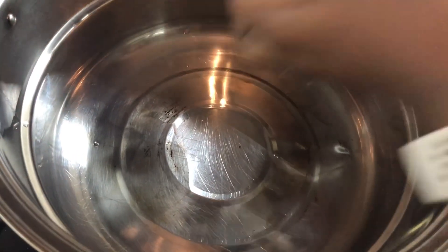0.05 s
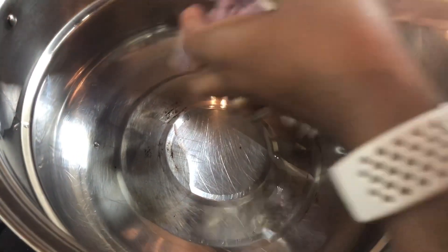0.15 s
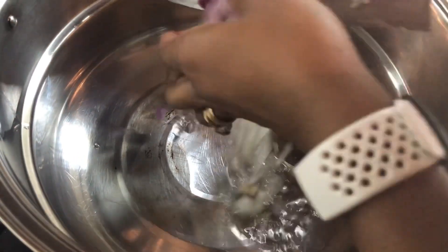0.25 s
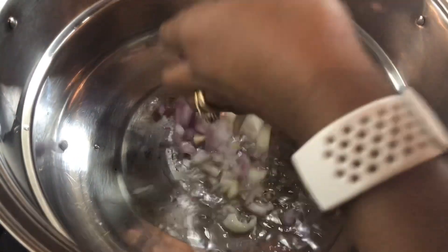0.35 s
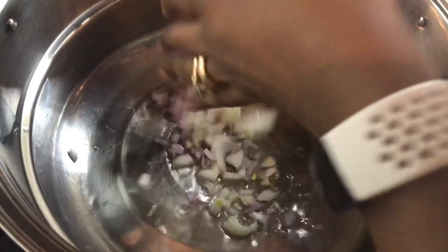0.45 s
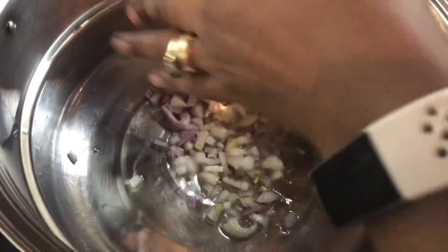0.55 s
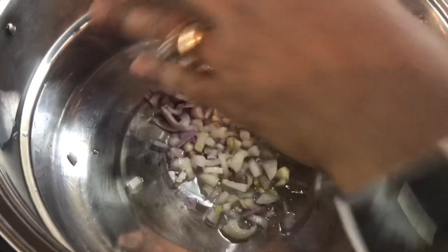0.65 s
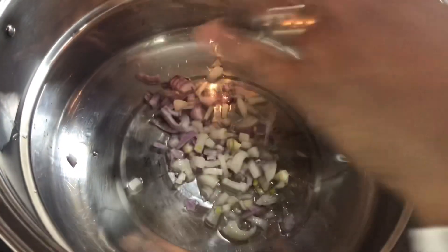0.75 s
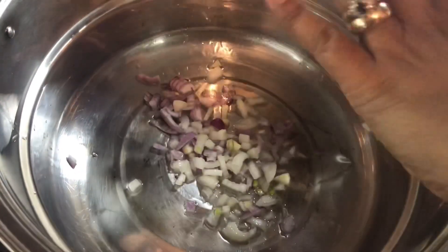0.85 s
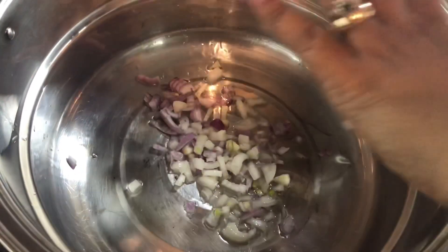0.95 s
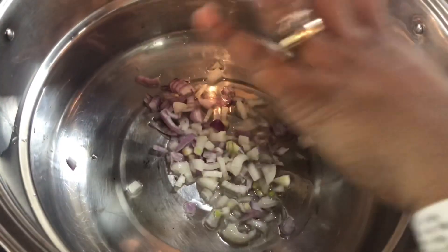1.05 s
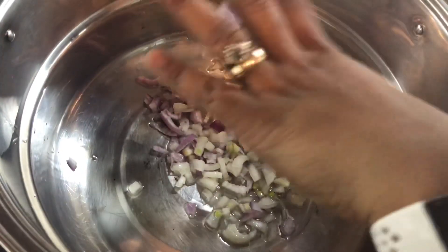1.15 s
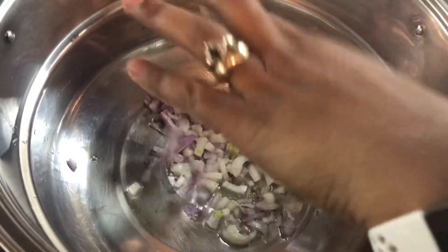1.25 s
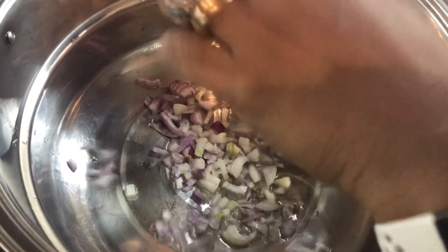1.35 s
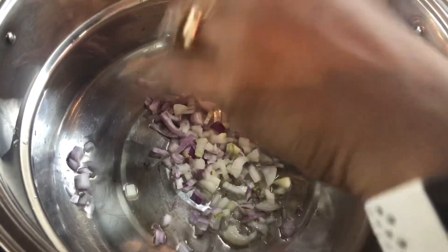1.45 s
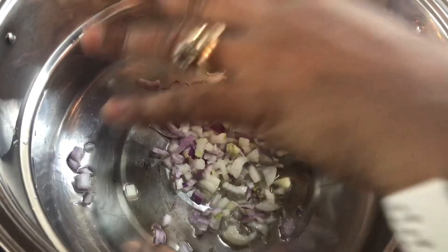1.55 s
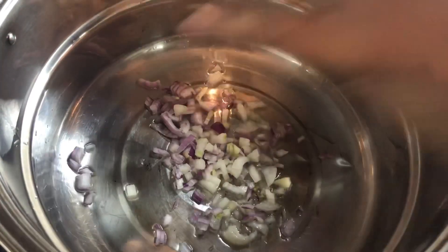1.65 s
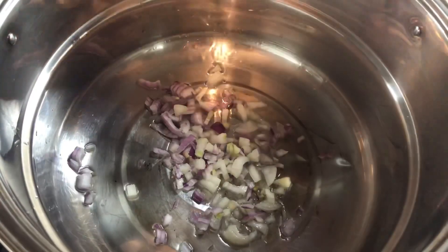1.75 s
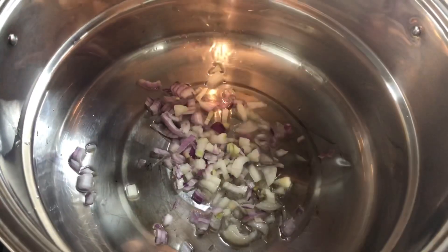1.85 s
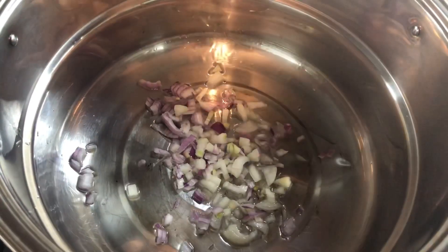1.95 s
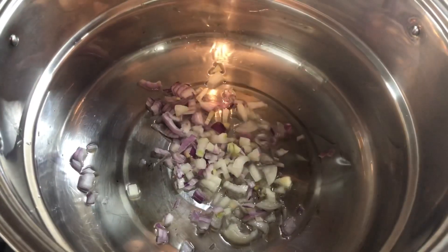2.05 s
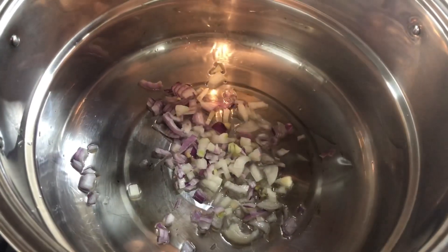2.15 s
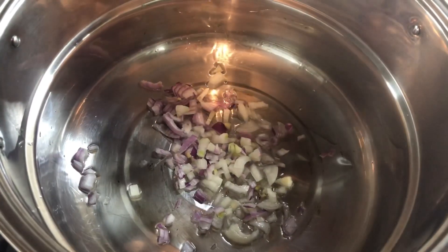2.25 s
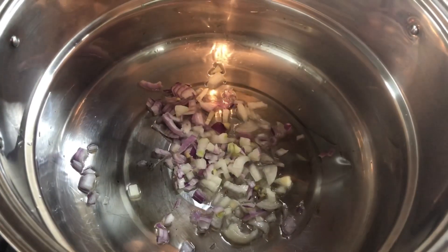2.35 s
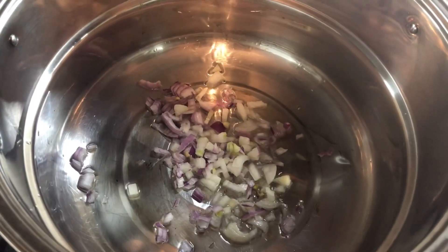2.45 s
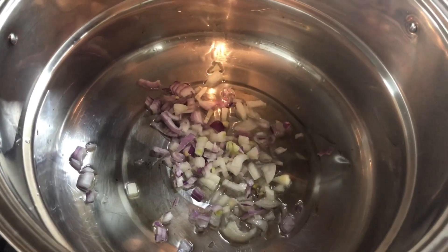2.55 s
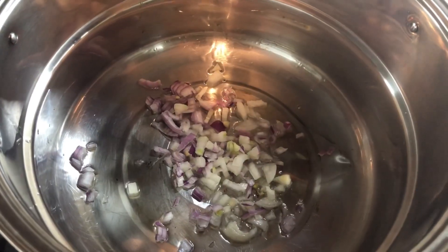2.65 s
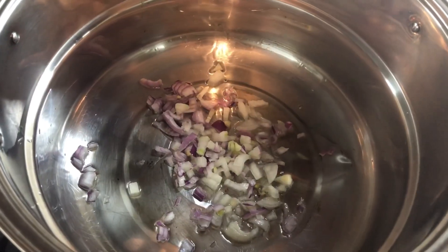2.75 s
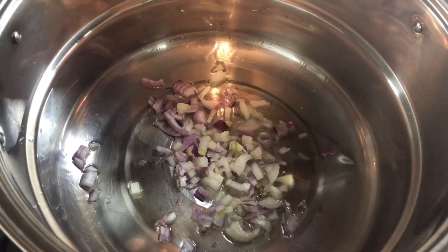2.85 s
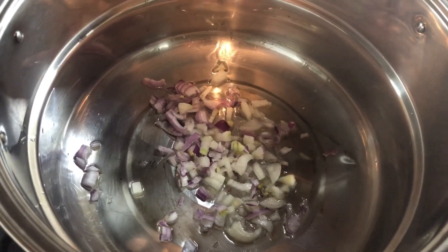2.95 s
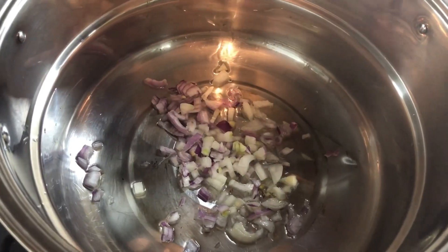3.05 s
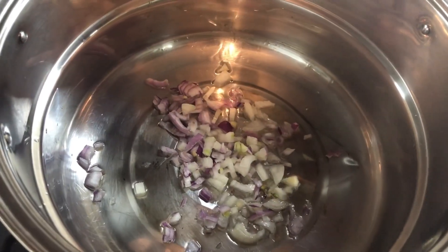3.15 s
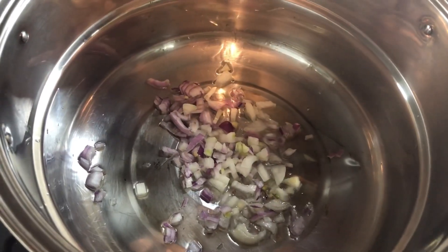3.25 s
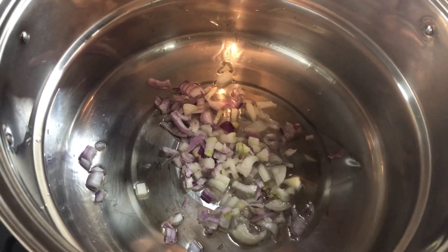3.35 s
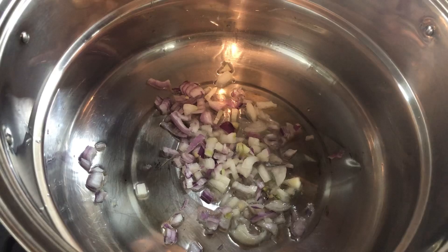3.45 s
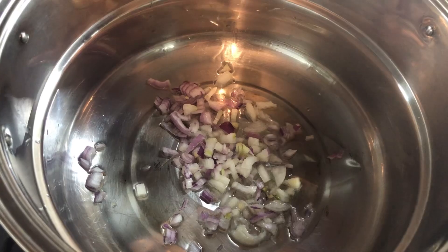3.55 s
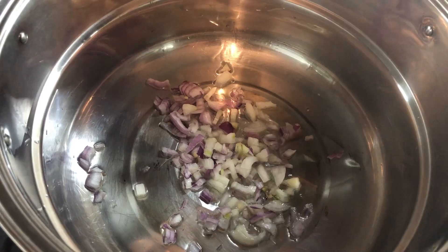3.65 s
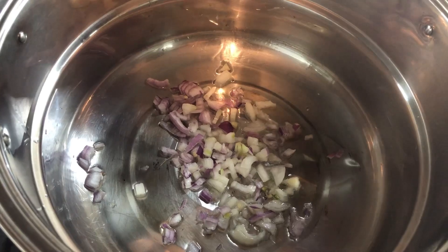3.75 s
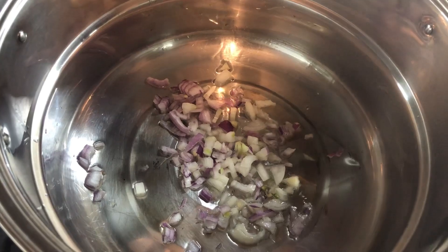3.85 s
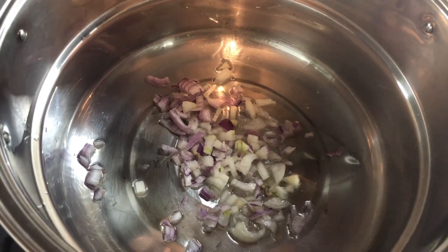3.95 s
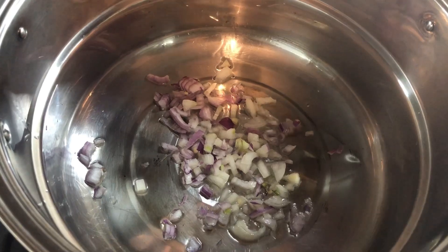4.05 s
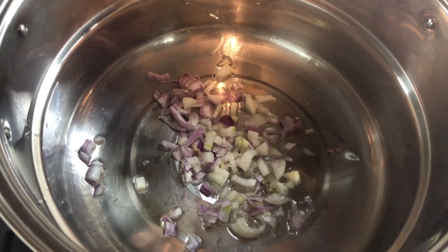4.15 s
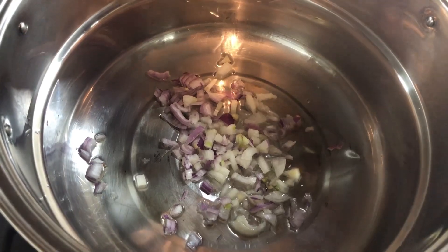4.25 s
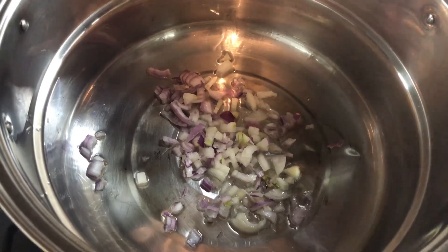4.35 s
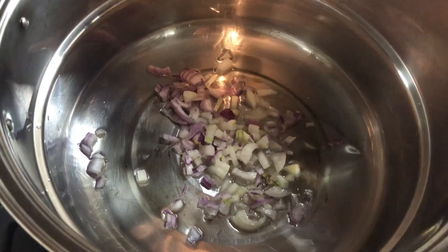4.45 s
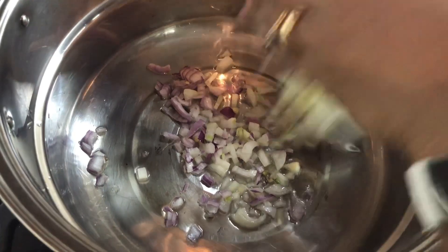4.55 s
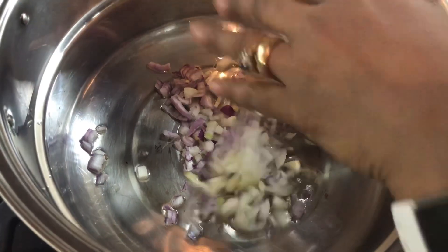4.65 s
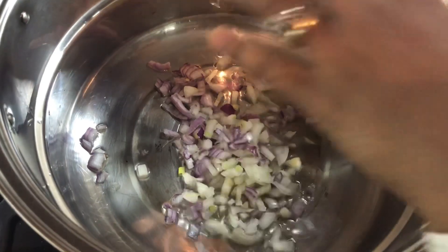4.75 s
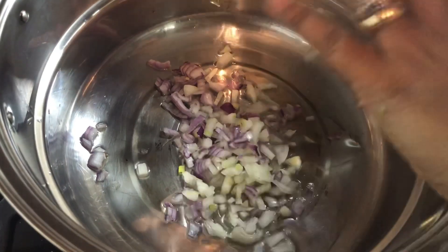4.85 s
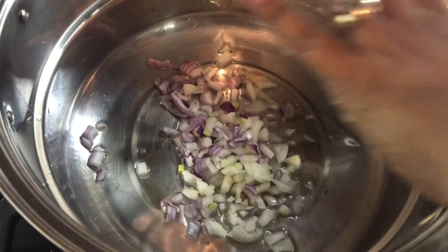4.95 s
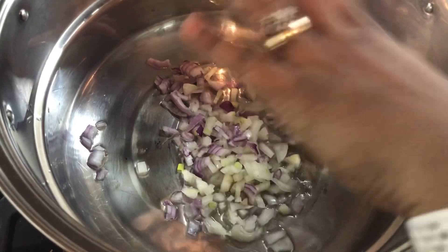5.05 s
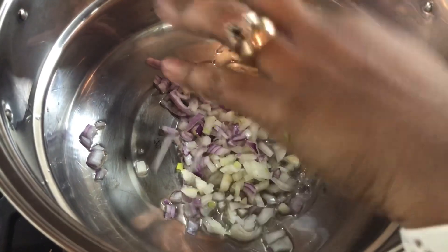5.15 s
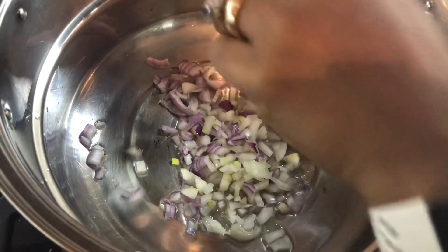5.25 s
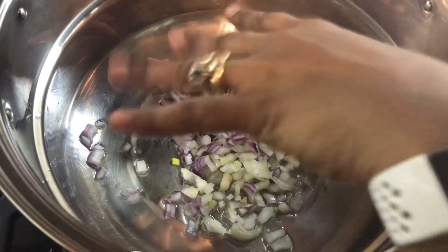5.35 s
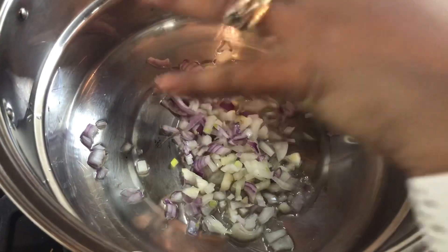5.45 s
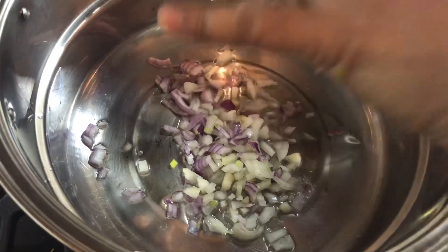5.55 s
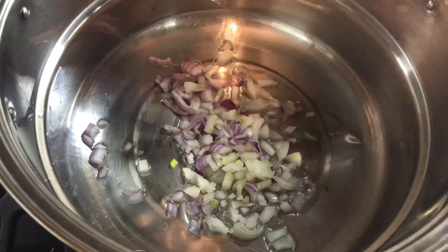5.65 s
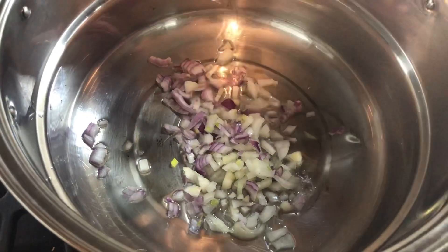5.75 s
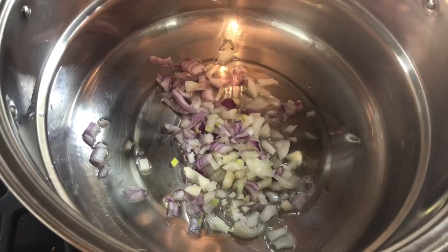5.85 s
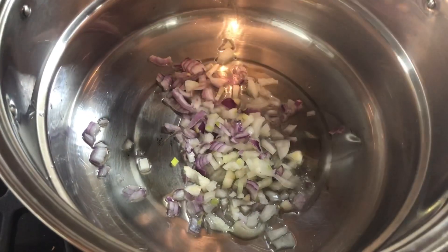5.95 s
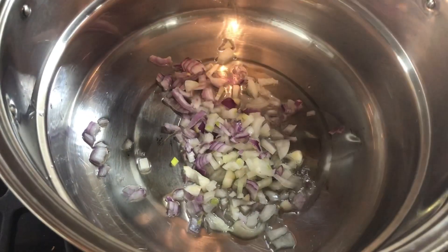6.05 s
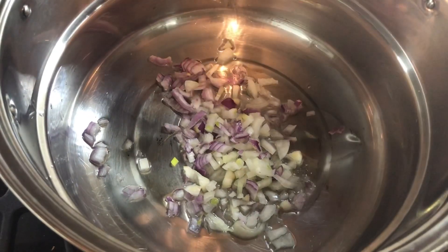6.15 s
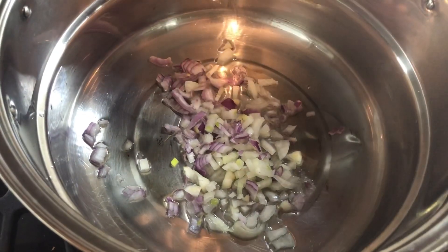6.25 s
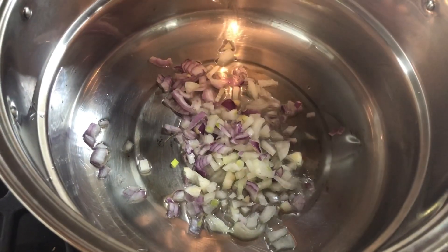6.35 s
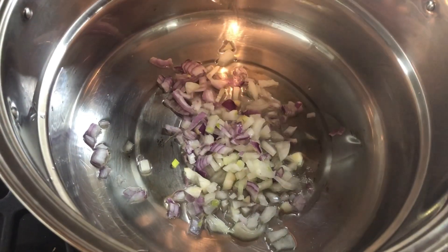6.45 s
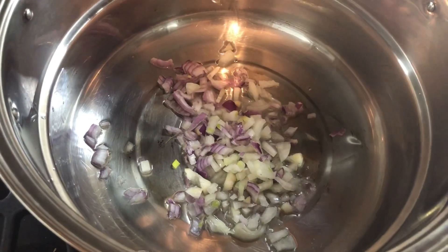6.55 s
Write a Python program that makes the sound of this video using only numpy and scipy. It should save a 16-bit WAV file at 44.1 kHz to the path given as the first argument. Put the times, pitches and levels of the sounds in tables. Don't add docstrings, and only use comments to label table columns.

```python
import sys
import numpy as np
from scipy import signal
from scipy.fft import rfft, irfft, next_fast_len
from scipy.io import wavfile
from scipy.ndimage import uniform_filter1d, map_coordinates

SR = 44100
rng = np.random.default_rng(int(sys.argv[2]) if len(sys.argv) > 2 else 0)


def volts(x):
    e = np.asarray(x, float) / 20
    return 10 ** e


def generate_wav(signal):
    frames = np.transpose(np.atleast_2d(signal))
    scaled = np.clip(frames, -1, 1) * 32767
    pcm = np.round(scaled).astype(np.int16)
    wavfile.write(sys.argv[1], SR, pcm)


N = 290619
T = np.arange(N) / SR

# pitch in Hz, level in dB per Hz.
AIR_COLOUR = [(15, -30), (30, -28), (53, -31), (70, -2.5), (137, -5), (170, -17), (241, -2), (371, -23),
              (486, -15), (1150, -28.5), (15800, -39)]
AIR_DB = -57.5
# pitch in Hz, time to fall 60 dB in seconds.
ROOM_FADE = [(200, 0.53), (2000, 0.21), (10000, 0.051)]

# start in seconds, hold in seconds, level at the pot bottom in dB,
# spot hit (1 wall, 2 air, 3 rim), level there in dB.
SHOWERS = [(.168, .015, -50, 2.3, 8), (.19, .03, -42, 1, -15), (.224, 0.081, -26.5, 1.6, -2),
           (.24, 0.06, -33.5, 3, 0.5), (.32, 0.069, -28.5, 3, -4), (.4, 0.035, -31.5, 1.6, -4),
           (.46, 0.071, -33, 1, 0), (.77, 0.0043, -34, 2, -5), (.81, .12, -55, 1, 8.5),
           (1.23, .04, -41, 2, -9), (1.27, .045, -37, 2.4, -8), (4.626, .02, -34, 2, -1),
           (4.665, .03, -38, 1, -12), (5.19, 0.0057, -47, 2, 10)]
SHOWER_RISE_S, SHOWER_FADE_DB_PER_S, POT_APART_DB = 0.024, 330, 9
# pitch in Hz, width in Hz, level in dB.
POT_PARTS = [
    [(132.6, 11.7, -6), (258, 39, -7.5), (372, 37, -2), (406.5, 37, -1.5), (680, 450, -22)],
    [(589, 28, 0.5)],
    [(758, 14, -3.5), (842, 41, 2)],
    [(1101, 24, 6), (1310, 42, 3), (1500, 100, -9), (1700, 100, -3), (2094, 27, -1.5), (2380, 34, -6.5)],
]
POT_BLOW_HZ = [453, 657, 845, 1580]
# time in seconds, level at the bottom in dB, spot hit, level there in dB.
THUDS = [(.162, -37, 3, -1), (.222, -19.5, 3, -3.5), (.281, -18.5, 2.5, 0), (.302, -20, 2.2, 3),
         (.395, -19, 1, -5.5), (.463, -29, 1.5, -5), (.49, -24, 1, 5), (.534, -28, 2.4, 6.5),
         (.572, -45, 1, 4), (.768, -31, 2.6, 0), (.798, -27, 3, -7), (.831, -32.5, 2.6, 9),
         (1.192, -31.5, 2.4, -6), (1.221, -29, 2.6, 0.5), (1.266, -21.5, 2.8, -4), (1.282, -25, 3, -7),
         (1.302, -23, 1.8, -6), (1.32, -33, 2, -4), (4.605, -41, 1, 4), (4.625, -23.5, 1.8, -0.5),
         (4.665, -28.5, 1.5, -6), (4.689, -39, 2.5, -16), (5.178, -47, 1, -3), (5.187, -35, 1.8, 9),
         (5.244, -37.5, 2.6, -7)]
# start in seconds, hold in seconds, level in dB, pitch in Hz.
CHIMES = [(.172, .03, -47, 820), (.17, .03, -54, 1080), (.17, .015, -57, 580), (.18, .035, -41, 380),
          (.228, .03, -28, 385), (.232, .015, -43, 2280), (.235, .015, -31, 790), (.235, .02, -36, 590),
          (.24, .04, -39, 1110), (.27, .11, -36, 1303), (.27, .04, -28, 375), (.305, .015, -33, 790),
          (.32, .02, -41, 1700), (.4, .02, -29, 390), (.4, .01, -39, 1100), (.44, .01, -45, 2140),
          (.465, .01, -36, 820), (.495, .065, -36, 583), (.6, .03, -50, 583), (.8, .03, -40, 575),
          (.86, .04, -44, 583), (1.05, .03, -56, 600), (5.46, .17, -56, 850), (5.9, .05, -60, 1260)]
SING_RISE_S, SING_FADE_DB_PER_S, SING_WIDTH_HZ, SING_ROUGH = .025, 600, 45, .35

# peak time in seconds, rise in seconds,
# fizz level in dB, fade in dB per second.
FLARES = [(.163, 0.0032, -37, 190), (.224, 0.0059, -31.5, 14), (0.303, 0.032, -21.5, 350),
          (.355, 0.073, -30, 6), (.36, 0.11, -37.5, 1), (.43, 0.17, -28.5, 64), (.77, .1, -33, 23),
          (1.28, 0.47, -31.5, 55), (2.52, .3, -41.5, 26), (3.35, 0.25, -41.5, 22), (4.31, 0.86, -41.5, 35),
          (4.79, 0.59, -39, 27), (5.4, 0.34, -44.5, 4)]
# pitch in Hz, level in dB per Hz.
FIZZ_COLOUR = [(590, -23), (1000, -10), (1290, -13.5), (2320, -8), (3000, -7), (3520, -4.5), (4590, 0.5),
               (7200, -0.5), (11300, -4.5), (14100, -3.5), (15800, -2.5)]
PATCHY_DB = 1.0
BRIGHT_HZ, BRIGHT_FOLLOWS, BRIGHT_SWAY_DB = 9000, .12, 1
SPRAY_PER_S, SPRAY_DB = 90, -14
# pitch in Hz, width in Hz, level in dB.
POT_HUM = [(231, 39, -10), (397, 75, -7.5), (852.3, 37, -2.5), (1263, 46, -6.5), (1698, 310, -13.5)]
HUM_DB, HUM_FOLLOWS, HUM_SWAY_DB = -55.5, 0.24, 2.5

# time in seconds, peak in dB, pitch in Hz, bright edge in dB.
SPITS = [(.3212, -12, 8400, -10), (0.406, -10.5, 8040, 0), (.7595, -12, 6550, 0), (0.7763, -3.5, 9000, -2),
         (.7959, -8.5, 9700, -6), (0.9648, -1.5, 7900, -12.5), (1.0706, -19, 6600, 3),
         (1.1899, -13, 6360, 3), (1.2772, -2.5, 9250, -4.5), (1.3125, -4.5, 7300, 1), (1.34, -12, 10940, 4),
         (1.435, -10, 9900, -3), (1.4721, -7.5, 6300, 0), (1.7237, -13, 8100, -11), (2.029, -15, 6630, 0),
         (3.126, -16.5, 4800, -7), (3.433, -9, 7450, -16), (3.755, -19, 7750, -19),
         (4.113, -17.5, 5240, -.5), (4.7057, -12.5, 10400, 0.5), (4.7601, -16, 10400, -2),
         (4.787, -12, 10700, -6), (5.1386, -19.5, 8100, -1), (5.2323, -20, 4650, -5),
         (5.257, -17.5, 9000, -10), (5.3032, -5.5, 9500, -13), (5.3776, -11, 9220, -2),
         (5.3984, -9.5, 9200, -6), (5.815, -13, 7700, -8), (6.3263, -20, 8200, -18)]
# time in seconds, peak in dB, pitch in Hz.
SPATTER = [(.4319, -19, 6720), (.9023, -14.5, 6460), (.9217, -15, 10680), (1.0318, -14.5, 9800),
           (1.1003, -15, 10940), (1.1245, -11, 9000), (1.2896, -14, 8100), (1.3034, -13, 7200),
           (1.3825, -18, 8440), (1.6096, -15.5, 6900), (1.663, -15.5, 10770), (1.7683, -19, 7670),
           (1.752, -20, 6000), (5.187, -24, 2600), (1.234, -19, 4000), (2.1361, -17, 7300),
           (2.7334, -26, 7320), (2.8321, -30, 8000), (2.9875, -21.5, 6890), (3.2684, -23, 4970),
           (4.0296, -25.5, 10940), (4.295, -20.5, 6290), (4.3265, -21, 5000), (4.4796, -22, 8790),
           (4.7225, -22, 3180), (4.885, -19, 6000), (5.1644, -20.5, 5260), (5.4493, -26, 7840),
           (5.542, -25, 6630), (6.429, -22, 2800), (1.2614, -14, 10900), (5.283, -24, 6520)]
# time in seconds, peak in dB, pitch in Hz.
TICKS = [(0.165, -25, 4280), (0.3491, -12, 5570), (0.4784, -14, 7050), (0.4898, -9, 8050),
         (0.5197, -11, 9240), (0.5274, -14, 4740), (0.6064, -15, 8480), (0.6604, -17, 4380),
         (1.8397, -18, 7050), (1.8771, -16, 5650), (2.4199, -18, 5490), (3.3214, -19, 5010),
         (3.3807, -20, 7350), (3.6985, -17, 4930), (3.7354, -19, 6980), (4.2433, -22, 7680),
         (4.4348, -22, 5110), (4.4638, -19, 5900), (4.6314, -19, 5530), (4.8284, -19, 6680),
         (5.0873, -26, 7810), (5.2001, -20, 6510), (5.438, -21, 6030), (5.6012, -23, 6850),
         (6.1684, -26, 11000), (6.4887, -26, 10500), (6.5286, -20, 5330)]
SMALL_EDGE_DB, TICKS_DB = -2.5, -5
WALL_SHARE, SPAN = 0.35, 96

# time in seconds, level in dB.
BOOMS = [(0.261, -50), (.4, -50), (0.518, -39), (1.279, -38), (2.261, -53), (2.718, -49), (3.039, -39),
         (3.149, -44), (4.638, -31), (4.7, -42), (6.07, -40), (6.278, -36.5), (6.321, -40)]
# pitch in Hz, width in Hz, level in dB.
COUNTER_MODES = [(83, 8.7, 0.5)]

# time in seconds, peak in dB, bright edge in dB, low notes in dB.
KNOCKS = [
    (2.227, -19, -3, 7),
    (2.752, -45, 2, -24),
    (3.021, -21, -7, -2),
    (3.024, -17, -11, 0),
    (3.198, -31, -15, 8),
    (6.046, -27, -9, 4),
]
# pitch in Hz, width in Hz, level in dB.
FREE_BOARD = [(668, 20, -10.5), (760, 8.2, 1.5), (860, 18, -2), (1028, 40, -13), (1186, 21, -8.5),
              (1320, 8.2, -17), (1398, 61, -8), (1634, 12, -16), (1846, 99, -0.5)]
# start in seconds, hold in seconds, pressure in dB,
# spot (1 third, 2 fourth, 3 grit), level there in dB.
DRAGS = [(2.31, 0.034, -40.5, 2, -8.5), (2.35, 0.066, -35, 2.5, -6.5), (2.425, 0.057, -32, 2.4, -6.5),
         (2.53, .03, -43, 2.4, -8), (2.575, 0.031, -41.5, 1.5, -4.5), (2.64, 0.02, -41.5, 1.7, -4),
         (3.125, .045, -45.5, 1, 6.5), (3.17, 0.013, -46, 3, 10), (3.19, 0.017, -38, 0.92, -1),
         (3.265, 0.034, -39, 2, -7), (3.32, .1, -42, 2, -10), (3.45, 0.048, -40.5, 1, -9),
         (6.14, 0.096, -51.5, 0.7, 1.5), (6.25, 0.047, -45.5, 1, -9), (6.33, 0.032, -48, 2, -7),
         (6.37, .13, -46.5, 2, -12)]
DRAG_RISE_S, DRAG_FADE_DB_PER_S, BOARD_APART_DB = 0.085, 400, 5.5
# pitch in Hz, width in Hz, level in dB.
BOARD_PARTS = [
    [(800, 130, -11), (965, 110, -3), (1150, 90, -4), (1320, 150, -9)],
    [(1647, 130, 18)],
    [(1900, 300, 20), (2128, 200, 27)],
    [(2470, 560, 9), (3350, 260, 10), (3760, 280, 9), (4830, 1100, 5.5)],
    [(86, 23, -5), (269, 72, 1), (419, 122, 1.5), (573, 66, 4), (740, 64, 2.5)],
]
# start in seconds, hold in seconds, level in dB, pitch in Hz.
CATCHES = [(2.23, .012, -33, 964), (2.24, .04, -45, 781), (2.345, .02, -42, 1160), (2.345, .01, -48, 2750),
           (2.38, .015, -38, 990), (2.36, .12, -47, 1680), (2.425, .07, -33, 960), (2.425, .05, -38, 1160),
           (2.45, .01, -45, 2150), (2.465, .01, -45, 2660), (2.48, .015, -46, 2110), (2.58, .03, -43, 960),
           (2.64, .04, -43, 950), (2.625, .045, -49, 2110), (2.65, .02, -49, 1650),
           (3.023, .008, -35, 1620), (3.023, .005, -41, 680), (3.055, .01, -47, 781),
           (3.135, .065, -41, 1640), (3.195, .015, -43, 571), (3.265, .04, -43, 960),
           (3.265, .09, -49, 2120), (3.32, .025, -47, 1380), (3.335, .015, -45, 1000),
           (3.36, .015, -48, 1260), (3.38, .015, -51, 2960), (3.39, .025, -46, 1100),
           (3.42, .015, -45, 950), (3.46, .04, -43, 980), (3.48, .015, -47, 1270), (6.055, .04, -46, 790),
           (6.15, .07, -52, 1660), (6.165, .01, -54, 1850), (6.17, .04, -55, 1320), (6.19, .03, -55, 680),
           (6.25, .015, -50, 970), (6.26, .015, -52, 1150), (6.28, .015, -51, 280), (6.33, .03, -55, 1380),
           (6.35, .06, -48, 947), (6.42, .01, -51, 1060), (6.465, .03, -50, 1020), (6.47, .03, -54, 850)]

# pitch in Hz, level in dB.
MAINS = [(48.6, -76), (97, -75)]
LOW_HZ, TOP_HZ = 88, 15600


def unit(x):
    return x / np.sqrt(np.mean(x ** 2) + 1e-20)


def along(points, hz):
    point_hz, value = np.transpose(points)
    return np.interp(np.log(hz + 1), np.log(point_hz + 1), value)


def wobble(rate):
    return map_coordinates(rng.standard_normal(int(N * rate / SR) + 4), [T * rate])


def filtered(x, response):
    m = next_fast_len(N + SR // 2)
    return irfft(rfft(x, m) * response(np.fft.rfftfreq(m, 1 / SR)), m)[..., :N]


def ring(x, modes):
    def response(f):
        total = 0
        for k, (hz, width, db) in enumerate(modes):
            push = 1j * f * width
            total = total + (-1) ** k * volts(db) * push / (hz * hz - f * f + push)
        return total
    return filtered(x, response)


def taps(rate, spread_db):
    hit = rng.random(N) < rate / SR
    return hit * rng.standard_normal(N) * volts(spread_db * rng.exponential(size=N))


def bursts(s, gain, hz, cycles):
    turns = hz[:, None] * np.arange(SPAN) / SR
    u = turns / cycles
    wave = gain[:, None] * np.sin(2 * np.pi * turns) * u * np.exp(1 - u)
    at = np.round(s * SR).astype(int)[:, None] + np.arange(SPAN)
    return np.bincount(at.ravel(), wave.ravel(), N + SPAN)[:N]


def in_pot(x, scatter_db, t60):
    t = np.arange(SR // 20) / SR
    echo = volts(scatter_db - 60 * t / t60) * rng.standard_normal(len(t))
    echo = echo * (rng.random(len(t)) < WALL_SHARE) * (t > .0002)
    echo[0] = 1
    return signal.fftconvolve(x, echo)[:N]


def from_spots(x, count, stay, scatter_db, t60):
    spot = rng.integers(0, count, N // stay + 1).repeat(stay)[:N]
    return sum(in_pot(x * (spot == k), scatter_db, t60) for k in range(count))


def swell(s, rise_s, hold_s, fade_db):
    climb = 40 * np.maximum(s - T, 0) / rise_s
    fade = fade_db * np.maximum(T - s - hold_s, 0)
    return np.maximum(-climb - fade, -200)


def parts(spot, there_db, apart_db):
    return volts(there_db - apart_db * np.abs(np.subtract.outer([1, 2, 3], spot)))


def strokes(rows, rise_s, fade_db, apart_db):
    power = 0
    for s, hold_s, db, spot, there_db in rows:
        share = np.append(1, parts(spot, there_db, apart_db))
        power = power + np.outer(share, volts(db + swell(s, rise_s, hold_s, fade_db))) ** 2
    return np.sqrt(power)


def sing(rows):
    x, t = np.zeros(N + SR), np.arange(SR // 4) / SR
    shiver = 1 + SING_ROUGH * (wobble(SING_WIDTH_HZ) + 1j * wobble(SING_WIDTH_HZ))
    starts = rng.integers(0, N - len(t), len(rows))
    climb_db = 40 * np.maximum(1 - t / SING_RISE_S, 0)
    for (s, hold_s, db, hz), start in zip(rows, starts):
        fade_db = SING_FADE_DB_PER_S * np.maximum(t - SING_RISE_S - hold_s, 0)
        tone = np.real(shiver[start:][:len(t)] * np.exp(2j * np.pi * hz * t))
        x[round((s - SING_RISE_S) * SR):][:len(t)] += volts(db - climb_db - fade_db) * tone
    return x[:N]


def patchy(x):
    z = signal.stft(x, nperseg=256)[2]
    field = uniform_filter1d(rng.standard_normal(z.shape), size=7, axis=0)
    field = uniform_filter1d(field, size=8, axis=1)
    return signal.istft(z * volts(PATCHY_DB * unit(field)), nperseg=256)[1][:N]


def kitchen_air():
    noise = rng.standard_normal(N)
    return volts(AIR_DB) * unit(filtered(noise, lambda hz: volts(along(AIR_COLOUR, hz))))


def room(x):
    hz, t, z = signal.stft(rng.standard_normal(SR // 2), SR, nperseg=256)
    fading = z * volts(-60 * t / along(ROOM_FADE, hz)[:, None])
    tail = signal.istft(fading, SR, nperseg=256)[1]
    return signal.fftconvolve(np.pad(x, (300, 0)), tail / np.linalg.norm(tail))[:N]


def onions():
    rain = [unit(ring(taps(600, 1.6) + 0.05 * rng.standard_normal(N), modes)) for modes in POT_PARTS]
    gains = strokes(SHOWERS, SHOWER_RISE_S, SHOWER_FADE_DB_PER_S, POT_APART_DB)
    x = volts(-1.5) * np.sum(gains * rain, axis=0)
    s, db, spot, there_db = np.transpose(THUDS)
    shares = [1, *parts(spot, there_db, POT_APART_DB)]
    for modes, share, hz in zip(POT_PARTS, shares, POT_BLOW_HZ):
        blow = bursts(s, volts(db) * share, hz + 0 * s, cycles=0.28)
        x = x + volts(15.5) * ring(blow, modes) + 0.7 * blow
    return x + sing(CHIMES)


def sizzle():
    fizz = np.sqrt(sum(volts(db + swell(s, rise_s, 0, fade_db)) ** 2 for s, rise_s, db, fade_db in FLARES))
    heat = fizz / np.median(fizz)
    colour = lambda hz: volts(along(FIZZ_COLOUR, hz))
    hiss = unit(patchy(filtered(rng.standard_normal(N), colour)))

    draw = rng.random((9000, 3))
    pitch_hz = np.clip(9000 * np.exp(0.88 * (draw[:, 1] - .4)), 2000, 16000)
    size_db = np.minimum(-5.5 * np.log(draw[:, 2]), 18)
    pops = bursts(draw[:, 0] * N / SR, volts(size_db), pitch_hz, cycles=0.35)
    crackle = unit(filtered(from_spots(pops, 5, 256, 1, 0.0083), colour))
    spray = unit(ring(in_pot(taps(SPRAY_PER_S, 2.5), -8, .012), [(13500, 5000, 0)]))
    steam = volts(.1) * hiss + volts(-4.5) * crackle + volts(SPRAY_DB) * spray

    top = filtered(steam, lambda hz: 1 / (1 + (BRIGHT_HZ / (hz + 1)) ** 4))
    bright = heat ** BRIGHT_FOLLOWS * volts(BRIGHT_SWAY_DB * wobble(7))
    clumps = volts(0.54 * wobble(13) + 0.55 * wobble(45))
    hum = volts(HUM_DB + HUM_SWAY_DB * wobble(6)) * heat ** HUM_FOLLOWS * (T > FLARES[0][0])
    metal = unit(ring(taps(1500, 1.1), POT_HUM))
    return fizz * clumps * (steam + (bright - 1) * top) + volts(1.5) * np.minimum(hum, volts(-50.0)) * metal


def spits():
    small = [(*row, SMALL_EDGE_DB) for row in SPATTER]
    smallest = [(s, db + TICKS_DB, hz, SMALL_EDGE_DB) for s, db, hz in TICKS]
    s, db, hz, edge_db = np.transpose([*SPITS, *small, *smallest])
    lead_s = rng.uniform(0.00021, .0018, len(s))
    tick = bursts(s - lead_s, volts(db - 5), 1.3 * hz, cycles=.5)
    crack = bursts(s - .0002, volts(db + 4.5), hz, cycles=0.37)
    edge = bursts(s - .0002, volts(db + edge_db + 11.0), 13500 + 0 * hz, cycles=0.39)
    echoed = from_spots(tick + crack + edge, 8, 512, -17, .026)
    return filtered(echoed, lambda f: (1j * f / (1500 + 1j * f)) ** 3)


def counter():
    s, db = np.transpose(BOOMS)
    push = bursts(s, volts(db + 38.5), 250 + 0 * s, cycles=0.06)
    return ring(ring(push, COUNTER_MODES), [(100, 37, 0)])


def board_knocks():
    s, db, edge_db, low_db = np.transpose(KNOCKS)
    s = s + 0.00046
    blow = bursts(s, volts(db), 1200 + 0 * s, cycles=0.36)
    edge = bursts(s, volts(db + edge_db), 2500 + 0 * s, cycles=0.41)
    under = bursts(s, volts(db + low_db), 700 + 0 * s, cycles=0.29)
    body = 7.5 * ring(blow, FREE_BOARD) + 0.8 * ring(under, BOARD_PARTS[4]) + 0.31 * under
    return in_pot(0.35 * blow + 1.73 * edge, -7.0, 0.015) + body


def board_drag():
    slips = volts(1.26 * wobble(55)) * (taps(2500, 1.0) + 0.21 * rng.standard_normal(N))
    shaken = [unit(ring(ring(slips, modes), modes) * volts(1.3 * wobble(40))) for modes in BOARD_PARTS]
    middle, third, fourth, grit, lower = shaken
    press, up, top, fine = strokes(DRAGS, DRAG_RISE_S, DRAG_FADE_DB_PER_S, BOARD_APART_DB)
    x = volts(1.5) * (press * middle + up * third + 0.65 * top * fourth + fine * grit)
    x = x + volts(-24) * press ** 0.55 * lower
    return x + sing(CATCHES)


def scene():
    near = onions() + spits()
    plank = board_knocks() + board_drag()
    echo = room(volts(-12.0) * plank + volts(-16) * near)
    return (near + plank + echo + counter() + sizzle() + kitchen_air())[None]


def top_cut(x):
    return signal.sosfilt(signal.butter(12, 16960, fs=SR, output="sos"), x)


def record(dry):
    band = lambda hz: (1j * hz / (LOW_HZ + 1j * hz)) ** 3 / (1 + (hz / TOP_HZ) ** 90)
    hum = sum(volts(db + 4.5) * np.sin(2 * np.pi * hz * T) for hz, db in MAINS)
    rounded = dry / (1 + np.abs(dry / .8) ** 4) ** (1 / 4)
    mix = filtered(rounded, band) + hum
    return top_cut(mix)


dry = scene()
out = record(dry)
generate_wav(out)
```